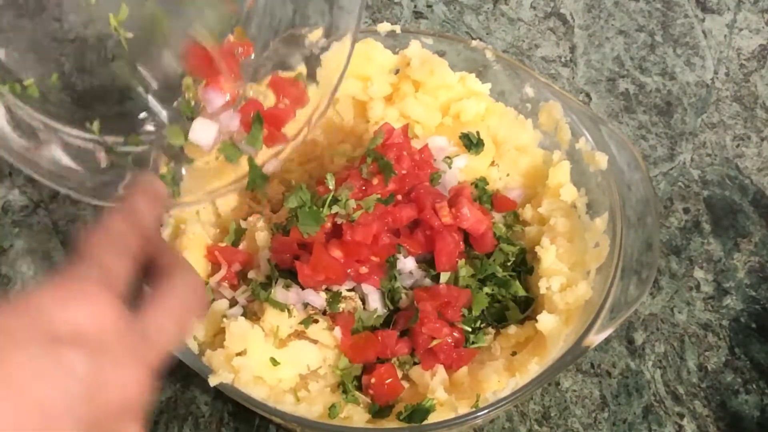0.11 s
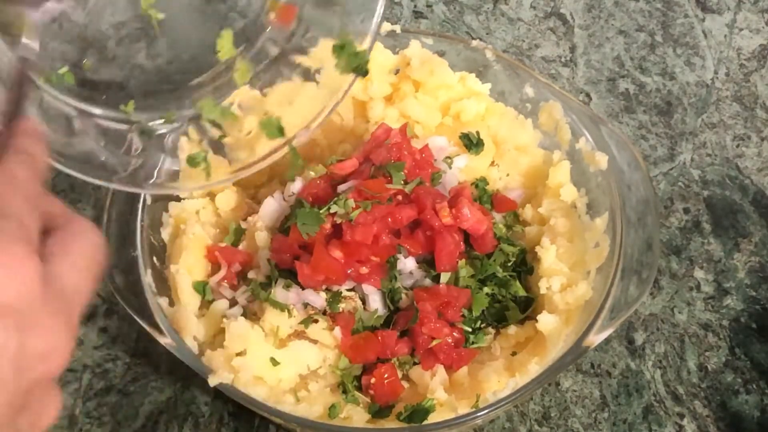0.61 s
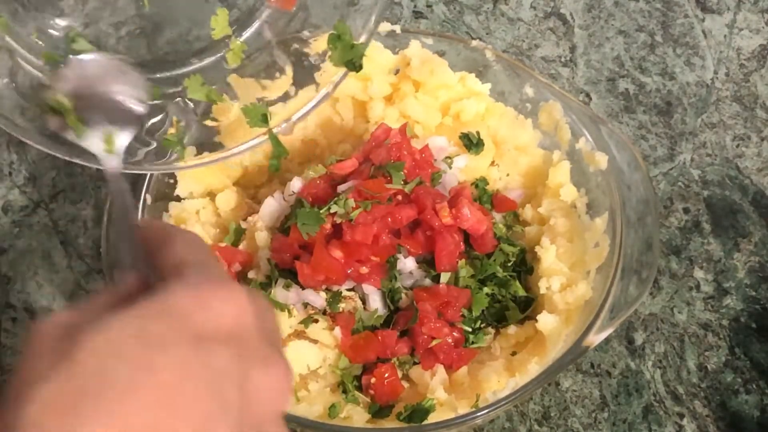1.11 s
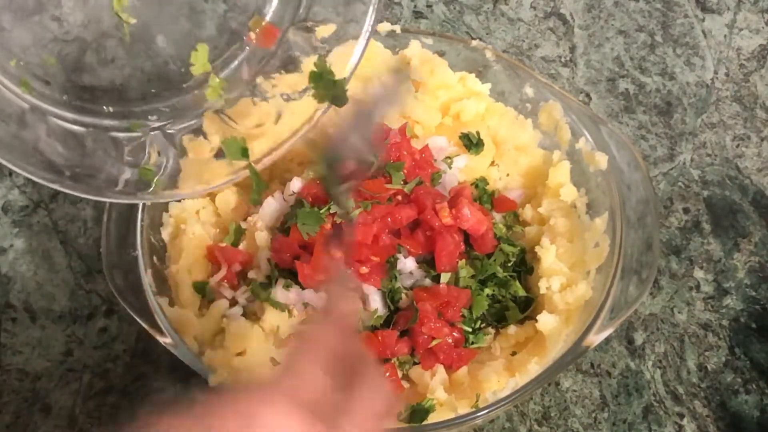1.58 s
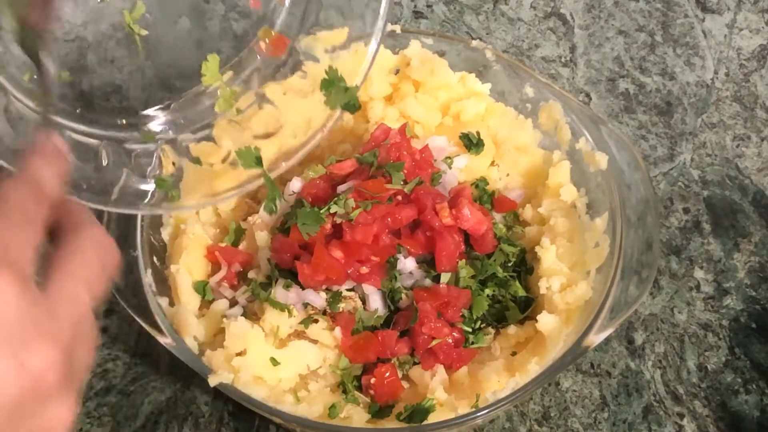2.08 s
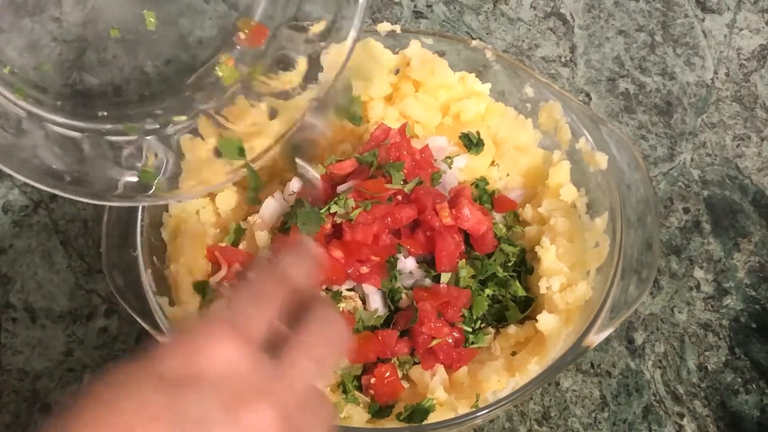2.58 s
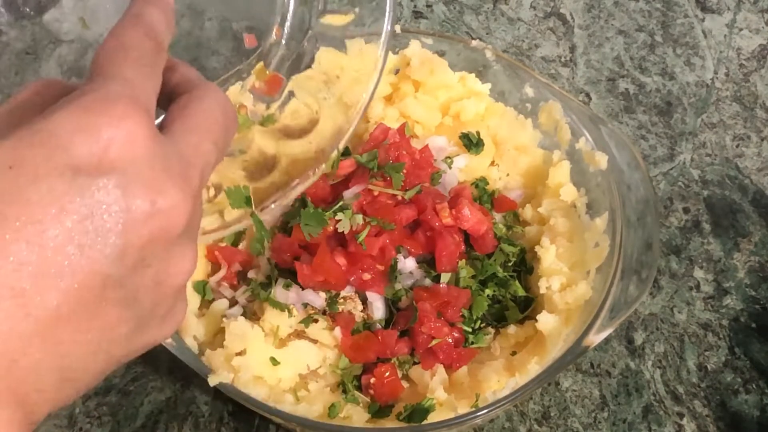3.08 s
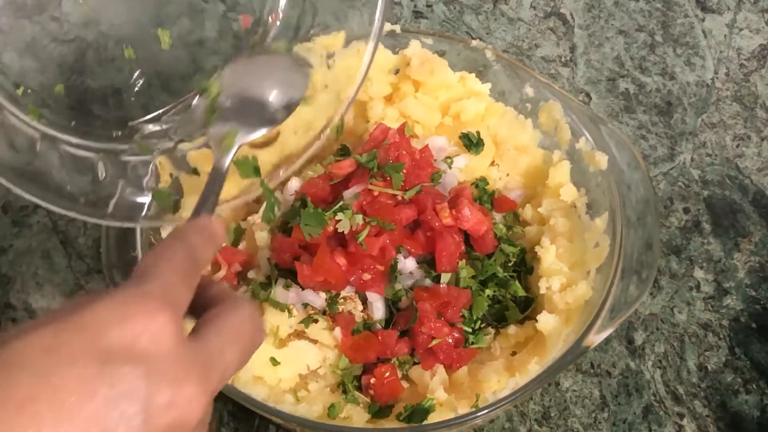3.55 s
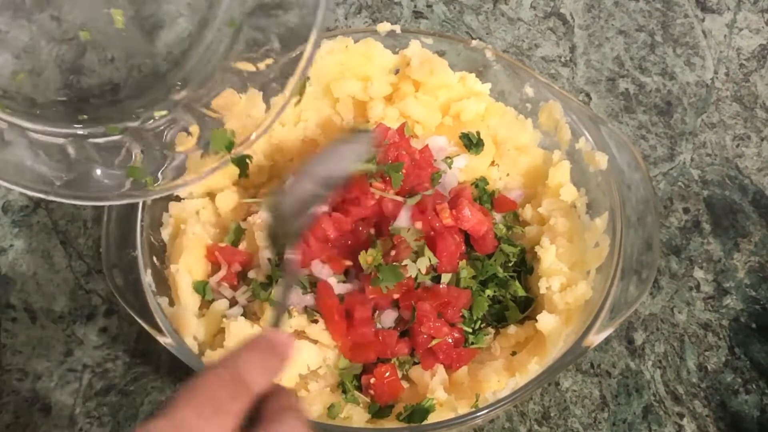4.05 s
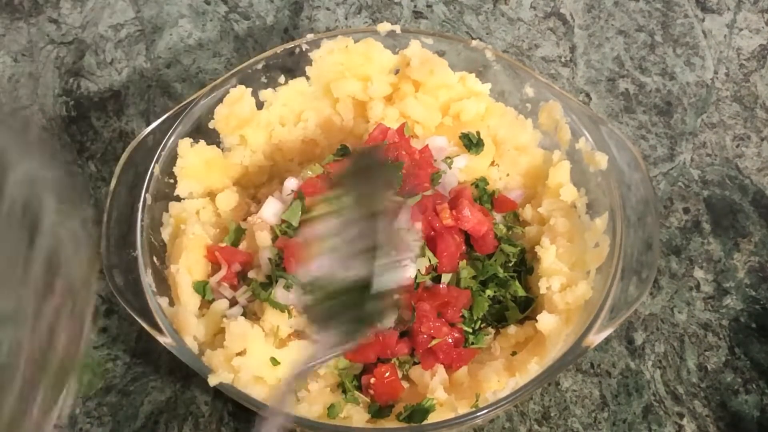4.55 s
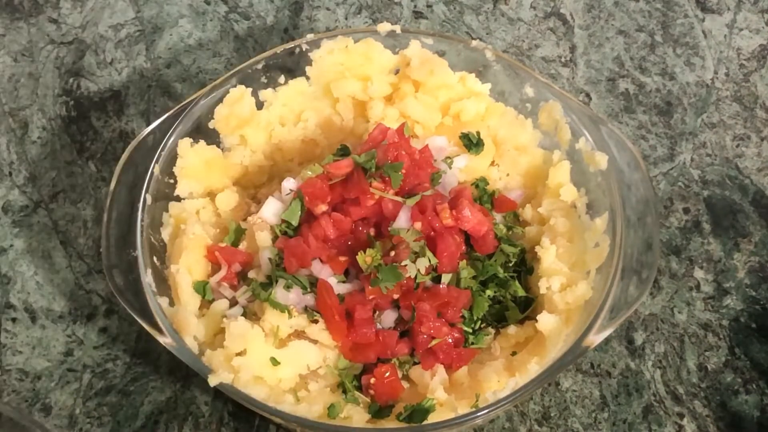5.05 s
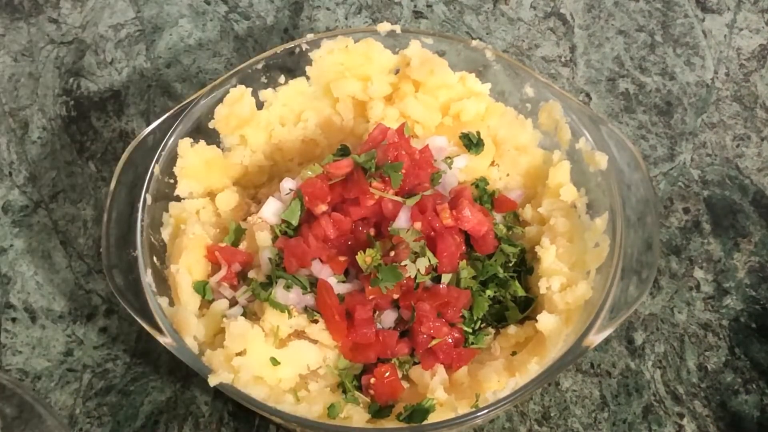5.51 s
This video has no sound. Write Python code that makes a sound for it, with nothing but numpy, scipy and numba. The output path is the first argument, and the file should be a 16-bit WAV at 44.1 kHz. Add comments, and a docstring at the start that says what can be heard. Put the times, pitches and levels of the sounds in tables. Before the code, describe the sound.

Close to the microphone, a steel spoon strikes and scrapes a hand-held glass bowl. Uneven bursts of bright, quickly damped clinks come with gritty scrapes and tiny squeaks, separated by short pauses. After a longer gap near the end, a few more taps land together with a dull low thump on the worktop. The kitchen is small and hard, with a short echo, soft air noise and faint fridge hum.

```python
"""A small hard kitchen: a steel spoon taps and scrapes a thick glass bowl held in one hand, close to a microphone.
Each tap rings damped modes of bowl and spoon over a short noise crack; scrapes feed them micro-slips and hiss,
and single modes squeak. One low thump of the worktop, a diffuse room tail, air noise and a fridge hum of
noise-fed resonances complete it; peaks beyond full scale clip."""
import sys
import numpy as np
from scipy import signal
from scipy.fft import rfft, irfft
from scipy.io import wavfile
from scipy.ndimage import uniform_filter1d
from numba import njit

SR = 44100
rng = np.random.default_rng(int(sys.argv[2]) if len(sys.argv) > 2 else 0)


def unload_audio(sound):
    """Save the sound as a 16-bit wav file, at the path given as the first command line argument."""
    columns = np.transpose(np.atleast_2d(sound))
    # keep every value between -1 and 1, then stretch to whole-number steps
    steps = np.round(np.clip(columns, -1, 1) * 32767)
    wavfile.write(sys.argv[1], SR, steps.astype(np.int16))


def elevation(decibels):
    """Turn decibel levels (scalar or array-like) into linear amplitude ratios."""
    levels = np.asarray(decibels, float)
    return 10 ** (levels / 20)


N = 249062
TIME_S = np.arange(N) / SR

# room air spectrum, shape only: (frequency [Hz], density [dB per Hz])
AIR_SHAPE = [(15, -69.5), (25, -31.5), (53, -32), (74, -12), (97, 7.5), (166, -15.5), (200, 0), (242, -2.5),
             (285, -1.5), (463, -8), (1040, -10), (2350, -21), (10700, -42), (16000, -48.5)]
AIR_DB, AIR_DRIFT_DB = -40.5, 0.3
# fridge hum resonances: (frequency [Hz], width [Hz], level [dB])
FRIDGE_HUM = [(97.4, 5.9, -49.5), (140, 4.9, -54), (200.8, 16, -55), (276, 36, -57.5)]
# kitchen decay: (frequency [Hz], t60 [s])
KITCHEN_DECAY = [(400, 0.13), (1200, 0.58), (3500, 0.5), (9000, 0.39), (15000, 0.43)]

# thump as the bowl is set on the stone worktop: (frequency [Hz], level [dB], t60 [s])
THUD_MODES = [(131, -21, 0.2), (330, -27, .08), (520, -23, .07)]
THUD_S = 5.385

# bowl modes: (frequency [Hz])
BOWL_HZ = [1122, 1320, 1870, 2410, 2465, 4125, 4185, 4340, 6392, 7475, 8300, 9030, 9750, 10260, 11600,
           13450, 14700]
# same bowl modes, before tap tilt and grip: (relative level [dB], undamped t60 [s])
BOWL_RING = [(-27, 0.086), (-30.5, .15), (-26, 0.1), (2.5, 0.14), (-8, 0.15), (-11.5, 0.14), (6, 0.074),
             (-16.5, 0.18), (2.5, 0.17), (-7.5, 0.2), (-10.5, 0.2), (-16.5, 0.14), (-6.5, 0.11),
             (-22.5, 0.078), (-12.5, 0.067), (-13.5, 0.11), (-19, .05)]
# spoon modes: (frequency [Hz])
SPOON_HZ = [2003, 2080, 3107, 3252, 3500, 4446, 4628, 4845, 5355, 5965, 6010, 7690, 8850, 9640, 11700,
            13050]
# same spoon modes, before grip: (relative level [dB], undamped t60 [s])
SPOON_RING = [(-11, 0.27), (-12.5, 0.29), (-5.5, 0.3), (-14, 0.43), (-11, 0.14), (4.5, 0.12),
              (-5.5, 0.1434), (-24.5, 0.085), (-9, 0.19), (-5.5, 0.12), (2.5, 0.082), (-7.5, 0.16),
              (-8, 0.099), (-10.5, 0.11), (-12, 0.09), (-13.5, 0.085)]
# fingers and food deaden the ring, from each time on: (time [s], damping factor [1])
GRIP = [(0, 1.46), (2.001, 0.93), (2.249, 1.5), (3.2, 1.31), (5.24, 1.7), (5.36, 1.6)]

# spoon dragged over glass: (start [s], length [s], pressure [dB], spoon's share of ring [0-1], edge rasp [dB])
SCRAPES = [(0.049, 0.22, -30, .5, -6.5), (0.275, .14, -32, 0.3, 1.5), (.95, .1, -35.5, 0.3, -0.5),
           (1.055, .06, -23.5, .6, 5.5), (1.127, 0.13, -26, .6, 1.5), (1.25, .12, -30.5, 0.7, 2.5),
           (1.379, .07, -30.5, 1, 3.5), (1.483, 0.031, -24.5, .7, 7), (1.536, 0.032, -35, 0.8, 3),
           (2.176, .13, -26.5, 0.3, 1), (2.315, 0.1, -31.5, 0, -0.5), (3.383, 0.12, -37, 0.2, 1),
           (3.531, .18, -33.5, 0.6, 4), (3.85, 0.042, -17, 0.9, 7.5), (3.899, 0.055, -32, 0.8, 4),
           (5.081, .16, -46, .7, 0), (5.255, 0.11, -43.5, 0, -4)]
# the hand leans in over a share of the stroke, then lifts after its end
PRESS_SHARE, LIFT_DB_PER_S = 0.37, 251.5
# pressed spoon stiffens the glass, shifted modes sing:
# (start [s], length [s], from [Hz], to [Hz], level [dB])
SINGING = [(0.113, 0.072, 2508, 2623, -31), (0.105, 0.11, 3133, 3220, -35.5),
           (0.203, 0.075, 9790, 9850, -33.5), (0.303, .07, 3250, 3235, -36.5),
           (1.422, 0.11, 1822, 1850, -43), (3.485, 0.047, 1704, 1613, -38.5),
           (3.86, .04, 3300, 3625, -22.5), (2.215, .06, 13500, 13600, -40.5), (0.094, 0.2, 4460, 4714, -35),
           (0.118, 0.053, 9020, 9350, -27.5), (0.191, 0.1, 1054, 1100, -45),
           (0.301, 0.082, 1950, 1900, -40.5), (0.993, 0.13, 4410, 4400, -26.5),
           (1.07, 0.047, 3110, 3110, -17.5), (1.278, 0.038, 3270, 3170, -19),
           (1.49, 0.04, 4440, 4250, -24.5), (2.199, 0.046, 2635, 2590, -31),
           (2.265, 0.039, 4350, 4333, -21.5), (2.271, 0.047, 2500, 2472, -24.5),
           (2.334, 0.08, 1846, 1882, -40), (3.318, 0.074, 6350, 6310, -25), (3.32, 0.045, 4276, 4100, -29),
           (3.391, 0.031, 1853, 1898, -34.5), (3.587, 0.063, 1680, 1706, -27),
           (3.898, 0.033, 2110, 2072, -35.5), (5.292, 0.029, 2510, 2445, -23)]
# chance squeaks: level above the pressure for 2 kHz, greatest detuning share, length
SQUEAK_DB, SQUEAK_SHIFT, SQUEAK_S = -11, .012, .04

# taps: (time [s], blow [dB], bowl ring above blow [dB], spoon ring above blow [dB],
# tilt from low to high bowl modes, by landing place [dB])
TAPS = [(0.0034, 6.5, -7, -29, -1), (0.025, -5, -10, -29.5, 1.5), (0.136, -24, -13.5, -30, -2),
        (0.2538, -17, -7.5, -29, -3), (0.327, -21.5, -12, -39.5, 3.5), (0.3931, -9.5, -17, -25, -1),
        (0.407, -6.5, -14.5, -9.5, -4.5), (0.8884, -23.5, -9.5, -20, 2), (0.9032, -33, -10, -26.5, -20),
        (1.0404, -8.5, -9.5, -12, -1), (1.0459, -1, -11, -13, -0.5), (1.0679, -4.5, -11.5, -20, -1),
        (1.0814, -2.5, -10.5, -30, 2), (1.1096, -9.5, -14, -31.5, 1.5), (1.1255, -2, -26, -10, 5.5),
        (1.1311, 0.5, -14.5, -21.5, 0.5), (1.182, -3, -17.5, -22, -5.5), (1.272, -13.5, -8, -25.5, 2.5),
        (1.2899, 1, -18.5, -30.5, 3), (1.4346, -15.5, -13, -17.5, -5.5), (1.495, -14, -14.5, -13, -6.5),
        (1.5118, -8, -27, -30.5, -4.5), (1.5407, -10.5, -17.5, -17.5, -5.5), (2.056, -22, -6.5, -30, 0.5),
        (2.0607, 4, -4, -32, 2.5), (2.2053, -17.5, -14.5, -32, 6.5), (2.2671, -6.5, -9.5, -26, 8),
        (2.3363, -23, -8, -26, 9), (2.61, -37.5, -13, -20, 8), (2.6615, 1.5, -16.5, -11.5, -4),
        (2.6893, -14.5, -15.5, -11, -16.5), (3.275, 2, -7, -21, 5), (3.2972, -4, -13, -18, 2.5),
        (3.3645, -19.5, -12.5, -22.5, 2.5), (3.539, 0.5, -8.5, -34.5, -2.5), (3.5581, -9, -12, -18.5, -5),
        (3.5759, 5, -13.5, -15, 4.5), (3.595, -3.5, -5, -14, 2), (3.6231, -8.5, -17, -32, -5),
        (3.6501, 2.5, -16.5, -23, 5), (3.839, -24, -7, -11.5, 1.5), (3.8514, -2, -22.5, -8, 13),
        (3.876, -4, -11, -17.5, 9.5), (5.0519, 2.5, -13, -15.5, 0.5), (5.0679, -9, -16, -16, -9.5),
        (5.109, -16, -11.5, -28, 8), (5.257, -1, -6, -37, -5.5), (5.3731, 9, -16, -20.5, -4.5),
        (5.3956, -3, -9.5, -31, -5), (5.4143, -6.5, -10.5, -17.5, -12)]
# offsets of low and high bowl modes from the middle ones; knock from the blow
LOW_DB, HIGH_DB, KNOCK_DB = -6.5, -8, -27.5
# crack spectrum, shape only: (frequency [Hz], density [dB per Hz])
CRACK_SHAPE = [(300, -33), (800, -25), (1200, -2.5), (2500, 4.5), (5000, 5), (9500, -2.5), (10900, -28.5),
               (12000, -9.5), (14500, -14.5), (16000, -23.5)]
# dull knock of the whole bowl, shape only: (frequency [Hz], density [dB per Hz])
KNOCK_SHAPE = [(300, -25), (800, -4.5), (1100, 4), (1300, 6), (1700, -7.5), (3000, -32.5)]
# flat blows that jolt the whole bowl: (time [s], knock level [dB])
JOLTS = [(0.8898, -26), (1.0694, -17.5), (3.276, -14.5), (3.3636, -22.5), (3.539, -17), (5.3745, -4.5),
         (5.3942, -13.5), (5.4149, -16.5)]


def unit(x):
    """Scale to rms 1."""
    return x / np.sqrt(np.mean(x ** 2))


def along_hz(hz, table):
    """Read (Hz, value) points on a log-frequency axis."""
    points = np.array(table, float)
    return np.interp(np.log(np.maximum(hz, 1)), np.log(points[:, 0]), points[:, 1])


def coloured(count, shape):
    """Noise with the given spectral shape, rms 1."""
    hz = np.arange(count // 2 + 1) * SR / count
    white = rfft(rng.standard_normal(count))
    return unit(irfft(white * elevation(along_hz(hz, shape)), count))


def walk(rate_hz):
    """Slow smoothed random signal, spread near 1, with rate_hz new values a second."""
    k = int(SR / rate_hz)
    steps = np.repeat(rng.standard_normal(N // k + 1), k)
    return unit(uniform_filter1d(steps, k)[:N])


@njit
def ring(force, pole):
    """One mode whose pitch and damping may move; a unit kick starts it at amplitude 1."""
    out, z = np.empty(len(force)), 0j
    for i in range(len(force)):
        z = z * pole[i] + force[i] + 1e-18
        out[i] = z.imag
    return out


def mode(force, hz, t60_s):
    """Ring a damped mode at hz (one value a sample)."""
    return ring(force, np.exp((2j * np.pi * hz - np.log(1000) / t60_s) / SR))


def air():
    """Room air: coloured noise whose level drifts a little."""
    return elevation(AIR_DB + AIR_DRIFT_DB * walk(4.214)) * coloured(N, AIR_SHAPE)


def fridge():
    """Wavering hum: narrow resonances fed by noise; wider ones decay sooner."""
    hum = 0
    for hz, width_hz, db in FRIDGE_HUM:
        tone = mode(rng.standard_normal(N), np.full(N, 1. * hz), 1.9 / width_hz)
        hum = hum + elevation(db) * unit(tone)
    return hum


def kitchen(x, gap_s=0.002):
    """Diffuse tail of a small tiled room: half-octave noise bands, each with its own decay."""
    t = np.arange(SR // 2) / SR
    tail = 0
    for hz in 250 * 2 ** np.arange(0, 6.1, .5):
        band = signal.butter(2, [hz / 2 ** .25, hz * 2 ** .25], "bandpass", fs=SR, output="sos")
        noise = signal.sosfilt(band, rng.standard_normal(len(t)))
        tail = tail + noise * np.exp(-np.log(1000) * t / along_hz(hz, KITCHEN_DECAY))
    # silent for one gap, then fades in over another
    tail = tail * np.clip(t / gap_s - 1, 0, 1)
    return signal.fftconvolve(x, tail / np.sqrt(np.sum(tail ** 2)))[:N]


def thud():
    """Low thump of the worktop: one kick rings a few low modes."""
    kick = 1. * (np.arange(N) == int(THUD_S * SR))
    return sum(mode(elevation(db) * kick, np.full(N, 1. * hz), t60_s) for hz, db, t60_s in THUD_MODES)


def squeaks(count=3):
    """A few modes per stroke, picked, detuned and timed by chance; higher ones are fainter."""
    modes_hz, rows = np.array(BOWL_HZ[2:] + SPOON_HZ), []
    chances = rng.random((len(SCRAPES), count, 4))
    for (start_s, length_s, db, *_), chance in zip(SCRAPES, chances):
        for when, which, first, last in chance:
            shift = SQUEAK_SHIFT * (2 * np.array([first, last]) - 1)
            hz = modes_hz[int(which * len(modes_hz))] * (1 + shift)
            level_db = db + SQUEAK_DB - 2.8 * np.log2(hz[0] / 2000)
            rows.append((start_s + when * length_s, SQUEAK_S, *hz, level_db))
    return rows


def singing(t60_s=0.044, locked_gain=0.51, random_gain=5.0):
    """Stick and slip partly lock to the singing mode, so it is fed in step as well as at random."""
    out = np.zeros(N + SR)
    t = np.arange(SR // 2) / SR
    for start_s, length_s, from_hz, to_hz, db in SINGING + squeaks():
        hz = np.interp(t, [0, length_s], [from_hz, to_hz])
        push = np.sqrt(np.clip(np.sin(np.pi * np.minimum(t / length_s, 1)), 0, 1))
        locked = np.sin(2 * np.pi * np.cumsum(hz) / SR)
        force = push * (locked_gain * locked + random_gain * rng.standard_normal(len(t)))
        tone = mode(force, hz, t60_s)
        i = int(start_s * SR)
        out[i:i + len(t)] += elevation(db) * tone / np.sqrt(np.mean(tone[:int(length_s * SR)] ** 2))
    return out[:N]


def drag(slips_per_s=2200., grit_db=2.2):
    """Dense uneven micro-slips under hand pressure: friction force, spoon's share, pressure, rasp."""
    pressure, spoon_part, rasp = np.full((3, N), 1e-9)
    for start_s, length_s, db, mix, rasp_db in SCRAPES:
        lean = np.clip((TIME_S - start_s) / (PRESS_SHARE * length_s), 0, 1)
        lift_db = LIFT_DB_PER_S * np.maximum(TIME_S - start_s - length_s, 0)
        stroke = lean * elevation(db - lift_db)
        pressure = pressure + stroke
        spoon_part = spoon_part + mix * stroke
        rasp = rasp + elevation(rasp_db) * stroke
    happens = rng.random(N) < slips_per_s / SR
    slips = happens * rng.standard_normal(N) * elevation(grit_db * rng.exponential(size=N))
    friction = unit(slips) * pressure * elevation(2.5 * walk(60.))
    return friction, np.clip(spoon_part / pressure, 0, 1), pressure, rasp / pressure


def chatter(decay_ms):
    """Force of one tap: steel rattles on glass for a few milliseconds; it feeds all pitches alike."""
    fade = np.exp(-1000 * np.arange(1024) / SR / decay_ms)
    rattle = rng.standard_normal(1024)
    # alternate fading and spectral flattening
    for _ in range(4):
        spectrum = rfft(rattle * fade ** .5)
        rattle = irfft(spectrum / np.abs(spectrum))
    return rattle


def burst(shape, t60_s):
    """Modes too close and too damped to hear apart: a short burst of noise."""
    t = np.arange(4096) / SR
    return coloured(4096, shape) * np.exp(-np.log(1000) * t / t60_s)


def taps(pressed, base_ms):
    """Tap forces on low, mid and high bowl modes and spoon, plus cracks; landing place sets the balance."""
    low, mid, high, spoon, cracks = np.zeros((5, N + 8192))
    for time_s, blow_db, bowl_db, spoon_db, tilt_db in TAPS:
        i = int(time_s * SR)
        # light taps glance off: longer rattle, less crack; a sliding spoon rattles longer too
        light = np.clip(-blow_db / 20, 0, 1)
        force = elevation(blow_db) * chatter(base_ms * (1 + 2.3 * light + 1.2 * pressed[i]))
        span = slice(i, i + len(force))
        low[span] += elevation(bowl_db + LOW_DB - tilt_db) * force
        mid[span] += elevation(bowl_db) * force
        high[span] += elevation(bowl_db + HIGH_DB + tilt_db) * force
        spoon[span] += elevation(spoon_db) * force
        crack = elevation(-11.5 - 11.0 * light) * burst(CRACK_SHAPE, 0.035)
        body = crack + elevation(KNOCK_DB) * burst(KNOCK_SHAPE, 0.089)
        cracks[i:i + len(body) + len(force) - 1] += signal.fftconvolve(force, body)
    return low[:N], mid[:N], high[:N], spoon[:N], cracks[:N]


def jolts(chatter_ms):
    """Flat blows jolt the whole bowl: chattering dull knocks."""
    out = np.zeros(N + 8192)
    for time_s, db in JOLTS:
        knock = signal.fftconvolve(chatter(chatter_ms), burst(KNOCK_SHAPE, 0.099))
        i = int(time_s * SR)
        out[i:i + len(knock)] += elevation(db) * knock
    return out[:N]


def grip_damping():
    """Stepwise damping by fingers and food: decay times are divided by it."""
    since_s, factor = np.transpose(GRIP)
    return factor[np.maximum(np.searchsorted(since_s, TIME_S) - 1, 0)]


def contacts():
    """Taps and friction drive every mode of bowl and spoon, under cracks, knocks and scrape hiss."""
    chatter_ms, firm_db = 3., -30
    bowl_rub_db, spoon_rub_db, hiss_db = -38.5, -36.5, -35.0
    patchy_db, shimmer_db = 4.5, 3.0
    friction, share, pressure, rasp = drag()
    pressed = np.tanh(pressure / elevation(firm_db))
    # pressed glass wanders further in pitch (share of the frequency)
    detune = 0.0019 + .005 * pressed
    low, mid, high, spoon, cracks = taps(pressed, chatter_ms)
    hiss = signal.fftconvolve(friction * rasp, burst(CRACK_SHAPE, .025))[:N]
    out = cracks + jolts(chatter_ms) + elevation(hiss_db) * hiss
    damping = grip_damping()
    bowl_rub = elevation(bowl_rub_db) * np.sqrt(1 - share)
    spoon_rub = elevation(spoon_rub_db) * np.sqrt(share)
    for k, (hz, (db, t60_s)) in enumerate(zip(BOWL_HZ + SPOON_HZ, BOWL_RING + SPOON_RING)):
        if k < len(BOWL_RING):
            blows, rub = low if hz < 3000 else high if hz > 5000 else mid, bowl_rub
        else:
            blows, rub = spoon, spoon_rub
        # the moving contact crosses each mode's nodes and detunes it a little;
        # fine grit drives the highest modes harder than a tap does
        reach_db = patchy_db * walk(20.) + shimmer_db * (hz > 8500)
        force = blows + rub * friction * elevation(reach_db)
        out += elevation(db) * mode(force, hz * (1 + detune * walk(18.0)), t60_s / damping)
    return out


def scene():
    """Background, close contacts and their echo in the kitchen."""
    background = air() + fridge()
    # small objects radiate little bass
    small = signal.butter(2, 700., "highpass", fs=SR, output="sos")
    near = signal.sosfilt(small, contacts() + singing()) + thud()
    return (near + elevation(-11.0) * kitchen(near) + background)[None]


def top_cut(x):
    """Nothing passes above the cut-off."""
    return signal.sosfilt(signal.butter(12, 16200, fs=SR, output="sos"), x)


def record(dry):
    """The microphone drops the deepest bass; the input clips flat at full scale."""
    bass_cut = signal.butter(2, 55., "highpass", fs=SR, output="sos")
    mic = signal.sosfilt(bass_cut, dry)
    return top_cut(np.clip(mic, -1, 1))


dry = scene()
out = record(dry)
unload_audio(out)
```